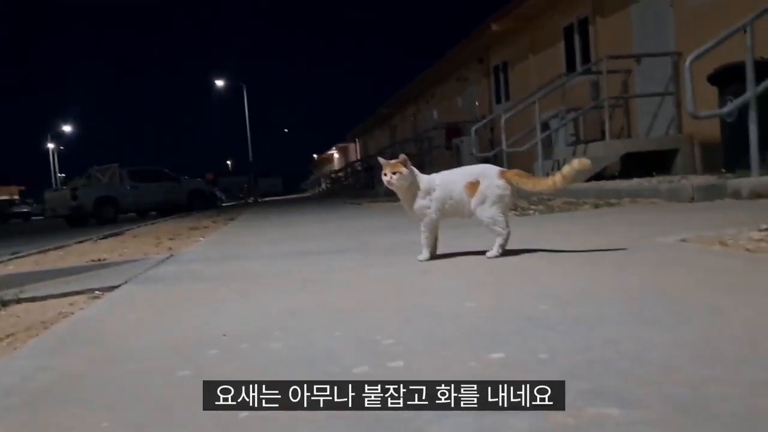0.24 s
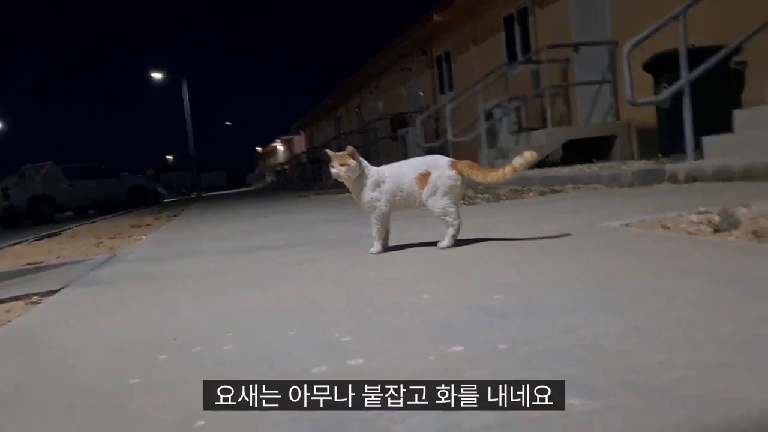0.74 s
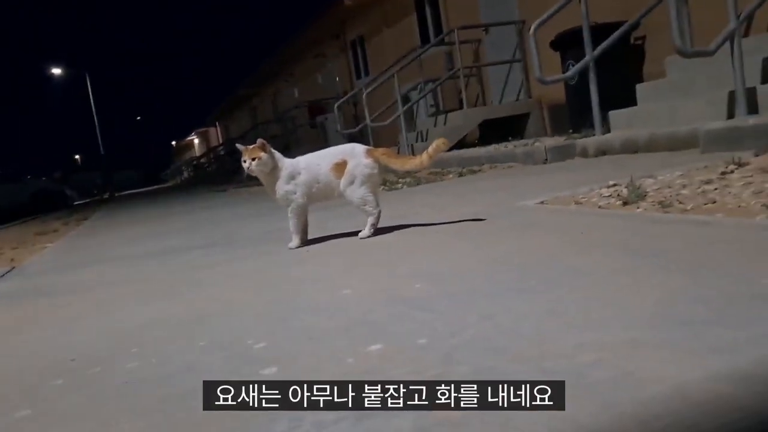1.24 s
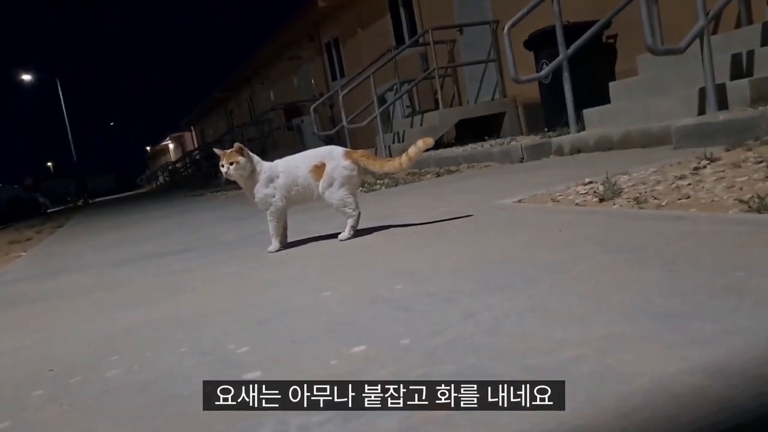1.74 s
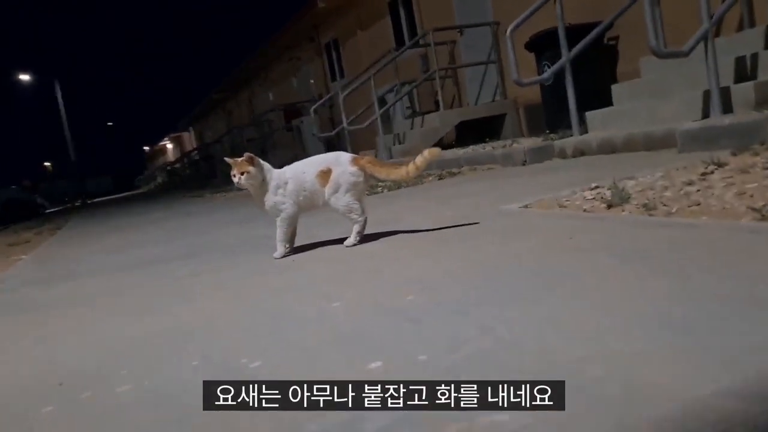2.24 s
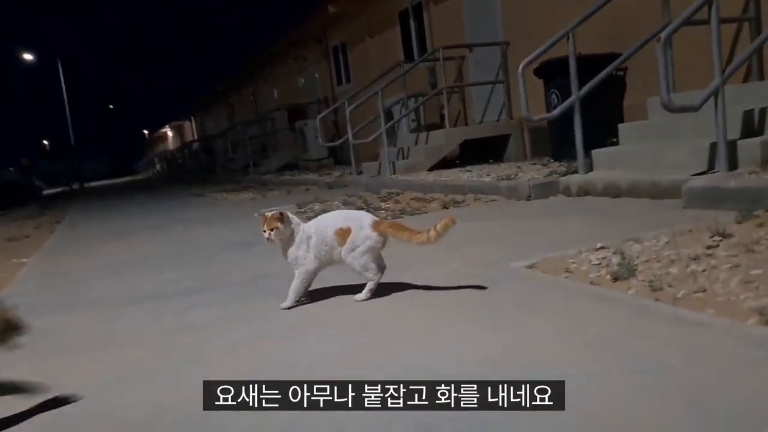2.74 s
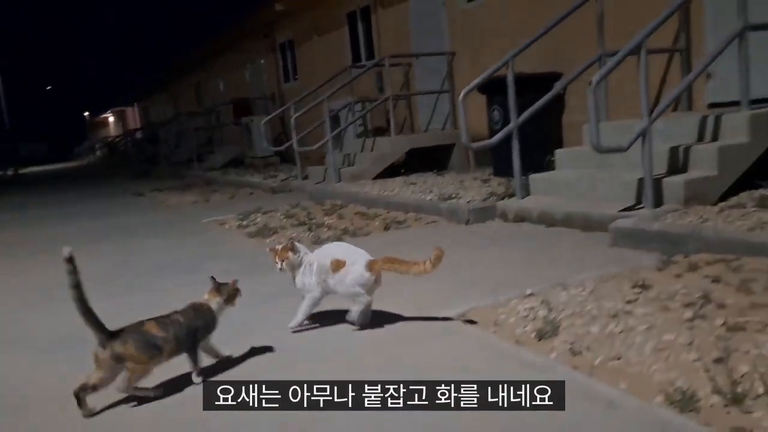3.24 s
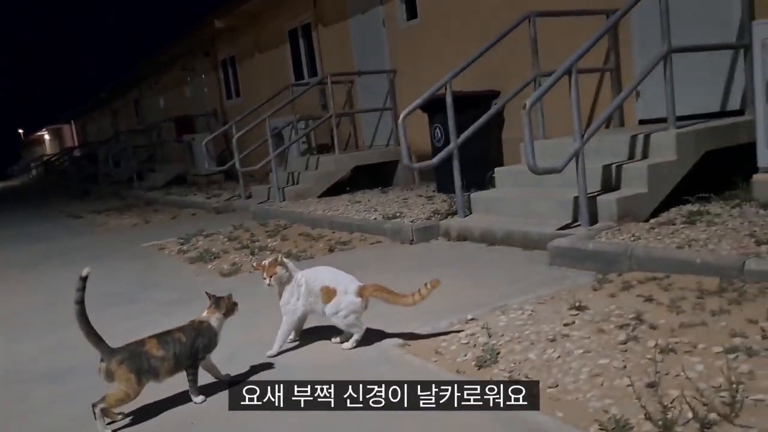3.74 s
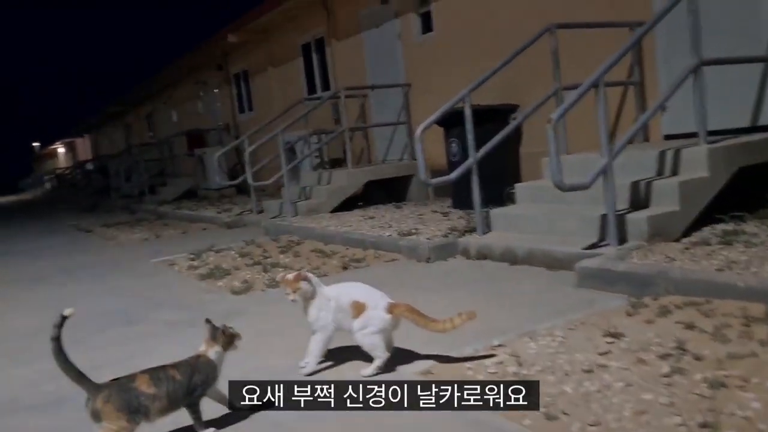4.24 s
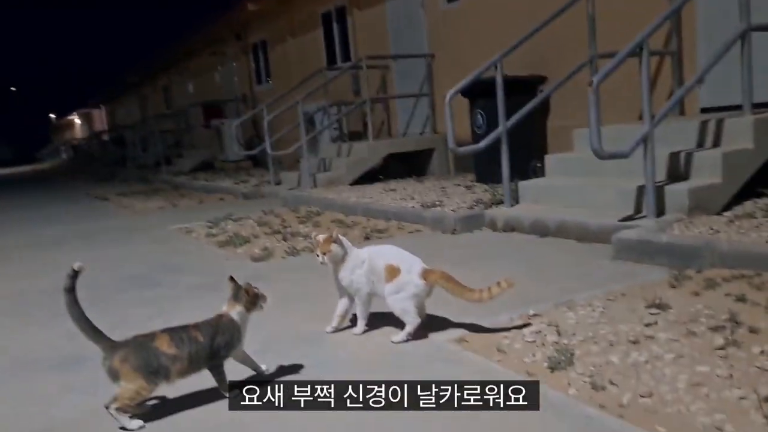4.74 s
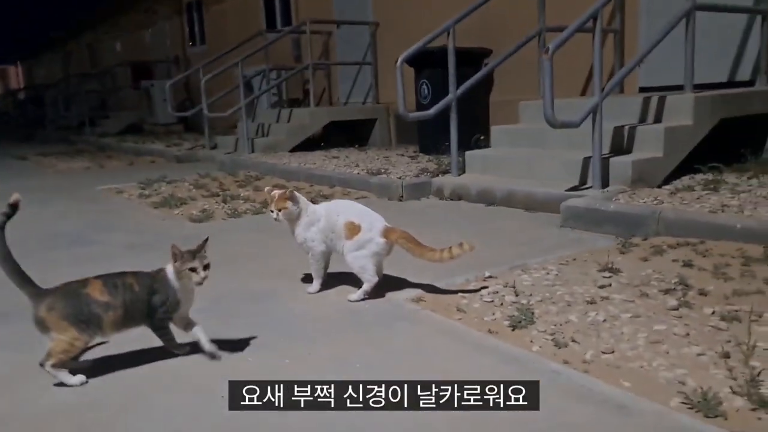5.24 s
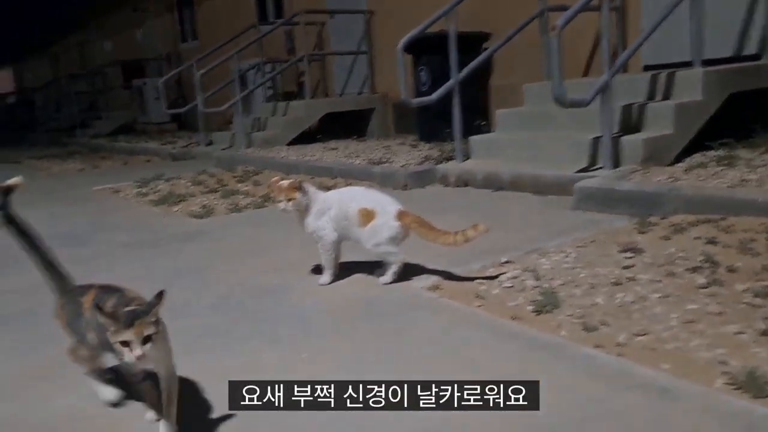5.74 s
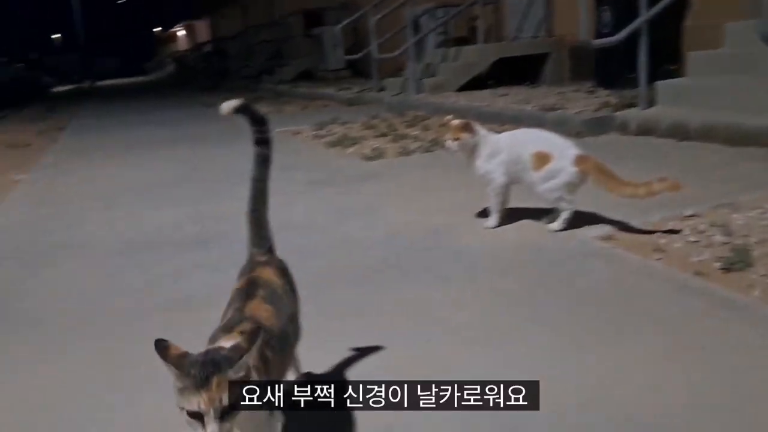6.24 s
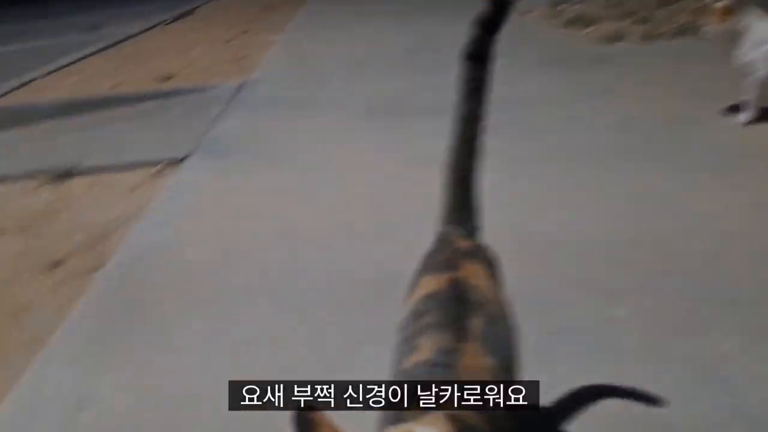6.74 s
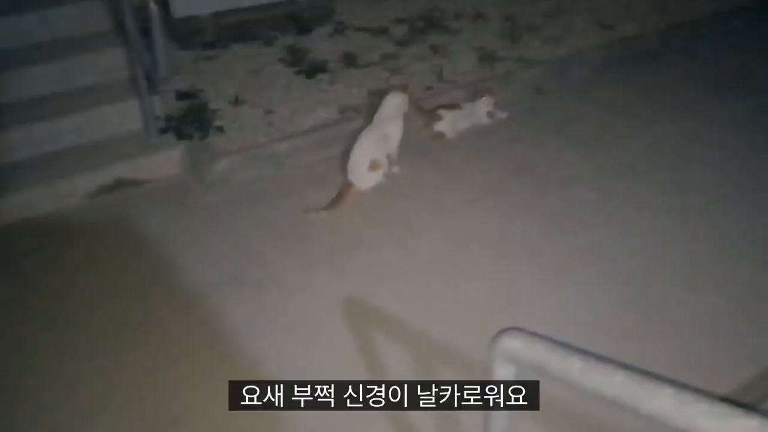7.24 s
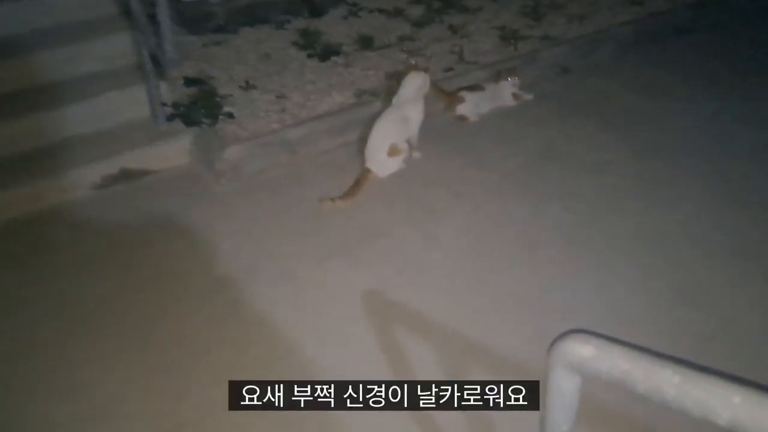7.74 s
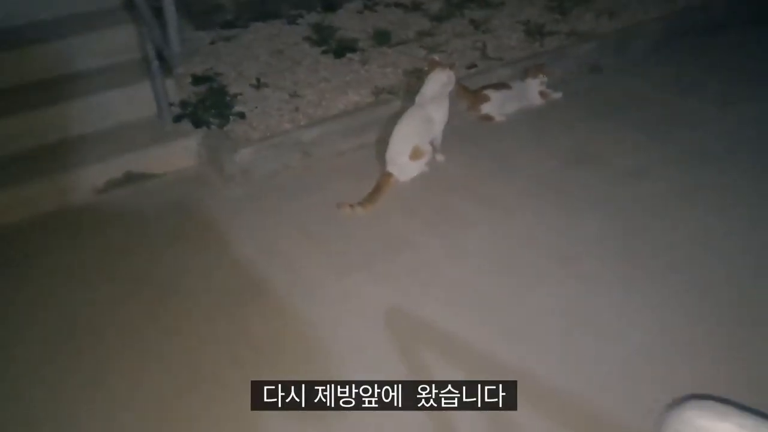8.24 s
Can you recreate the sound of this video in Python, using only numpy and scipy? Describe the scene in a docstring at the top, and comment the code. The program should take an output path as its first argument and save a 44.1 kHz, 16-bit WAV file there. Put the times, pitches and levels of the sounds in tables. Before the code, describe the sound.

Handheld stereo microphone outdoors, cats a few steps off with short echoes from wall and ground. A soft high whine comes under jacket rustle, then a raspy growl with hisses and thin whistles, then a loud strained yowl of over a second. A bird chirps now and then from farther off with a reverberant tail. Wind puffs, small scuffs and tiny metal tinkles surround it; near the end a brief gap leads to a different, low background noise.

```python
"""A concrete path beside a building at night, where two cats face off: one whines, growls and then yowls.
Its voice is a stack of overtones, roughened by strain, plus noise shaped like air in the mouth and teeth.
Gliding tones make a bird's chirps, ringing tones a collar tag, and tiny clicks and noise bursts a jacket and shoes.
A wavering tone and filtered noise make distant machinery, a soft airy hiss and wind.
Near the end the sound drops out briefly and resumes in a second spot with its own steady background noise."""
import sys
import numpy as np
from scipy import signal
from scipy.io import wavfile

SR = 44100
rng = np.random.default_rng(int(sys.argv[2]) if len(sys.argv) > 2 else 0)


def materialize(psi):
    """Save the field psi as 16-bit PCM at rate SR to the path in sys.argv[1].

    A 1-D psi becomes a single channel; in a 2-D psi each row is a channel.
    """
    bounded = np.clip(np.atleast_2d(psi).T, -1, 1)
    quanta = np.round(bounded * 32767).astype(np.int16)
    wavfile.write(sys.argv[1], SR, quanta)


N = 373736
T = np.arange(N) / SR  # time of every sample, in seconds

# Source levels below are starting points; trims, echoes and the final output gain come on top.

# Melody of the yowl. Each row: time in seconds, pitch in Hz.
YOWL_PITCH = [(4.3, 796), (4.36, 898), (4.535, 909), (4.548, 824), (4.585, 826), (4.68, 750), (4.78, 757),
              (4.85, 691), (5.0, 670.7), (5.45, 706.6), (5.54, 752), (5.645, 830), (5.7, 748)]
# The mouth shifts weight between overtones. Each row: time in seconds, second, third and fourth harmonic in dB.
YOWL_OVERTONES = [(4.3, -78, -73.5, -92), (4.38, -67.5, -52.5, -69), (4.6, -64, -53.5, -63.5),
                  (4.665, -57, -68, -75), (4.775, -52, -68, -70), (4.815, -62, -70, -75.5),
                  (4.93, -66.5, -58.5, -75.5), (5.02, -75, -62, -73.5), (5.5, -73.5, -68, -79),
                  (5.61, -58.5, -71, -79), (5.655, -64, -68, -81), (5.7, -79, -78, -86)]
# Strain of the voice. Each row: time in seconds, roughness (about 0 to 1), fundamental in dB,
# loss in dB for each harmonic above the fourth.
YOWL_STRAIN = [(4.3, 1.1, -90, 9), (4.355, 0.97, -77, 8), (4.38, 0.26, -75, 3), (4.61, .3, -78, 3),
               (4.68, 0.15, -80, -1.5), (4.9, 0.16, -82, -1), (5.3, 0.24, -82, 1), (5.45, 0.42, -68.5, -6),
               (5.62, 0.44, -66.5, 4), (5.7, 1.05, -78, 5)]
# Cracks of the voice, a drop and a climb back. Each row: start in seconds, drop in Hz, recovery in seconds.
CRACKS = [(4.376, 65, 0.017), (4.407, 140.5, 0.022), (4.442, 50, 0.013), (4.467, 133, .055)]
# Uneven beating of the vocal folds. Each row: centre in seconds, half-length in seconds, depth in dB.
DOUBLING = [(4.375, 0.032, -9), (4.537, .012, -8), (4.61, .02, -16)]
# Clean lower note that opens the yowl. Each row: time in seconds, pitch in Hz, second and third harmonic in dB.
OPENING = [(4.13, 648, -72, -76), (4.17, 664, -80, -97), (4.22, 667.5, -62, -61),
           (4.35, 642.5, -65.5, -65.5), (4.39, 625, -73, -80), (4.45, 625, -66.5, -70),
           (4.48, 604, -90, -92)]
CRACK_FALL_S = 0.013
YOWL_BREATH_DB, YOWL_CATCH_DB = -22, 1.5  # air noise beside the overtones; unevenness of the effort

# Soft warning whine. Each row: time in seconds, pitch in Hz, fundamental and second harmonic in dB.
WHINE = [(1.3, 818, -67, -75), (1.38, 908, -80, -74), (1.48, 910, -89, -76), (1.56, 881, -86, -68),
         (1.68, 877, -80, -87), (1.82, 836, -69.5, -97), (1.93, 770, -77, -88), (2.0, 720, -66, -80)]
# Growl as the other cat comes near. Each row: time in seconds, pitch in Hz, level between pushes in dB.
GROWL = [(3.0, 450, -78), (3.12, 510, -66), (3.19, 504, -61), (3.27, 426, -66), (3.32, 426, -61),
         (3.39, 455, -76.5), (3.6, 359.9, -67), (3.84, 303, -70)]
# Pushes of air. Each row: centre in seconds, half-length in seconds, voice, hiss and open-mouth rasp in dB.
PUSHES = [(3.125, 0.025, -62, -74.5, -77), (3.242, 0.014, -61.5, -56, -69), (3.382, 0.02, -56.5, -61, -63),
          (3.513, 0.02, -66, -59, -72), (3.574, 0.02, -69, -69, -73), (3.701, 0.031, -69, -69, -67)]
# Thin whistles of the strained voice. Each row: start and end in seconds, first and last pitch in Hz, level in dB.
WHISTLES = [(3.032, 3.25, 1893, 2020, -81), (3.287, 3.476, 1830, 1845, -77),
            (3.467, 3.727, 2170, 2134, -74.5), (3.497, 3.858, 1752, 1520, -80),
            (6.007, 6.073, 1204, 990, -69)]
# Longer hisses through the teeth. Each row: centre in seconds, half-length in seconds, level in dB.
HISSES = [(3.4, 0.35, -80), (5.25, 0.079, -77.5), (5.68, 0.14, -68)]
# Resonances of the throat, open mouth and teeth. Each row: frequency in Hz, width in Hz, level in dB.
THROAT = [(398, 163, -1.5), (835, 320, -11), (1700, 310, -20.5), (2190, 440, -16.5), (3400, 730, -21),
          (7140, 470, -5)]
OPEN_MOUTH = [(740, 206, 1), (1030, 190, -4)]
TEETH = [(3700, 1800, -8.5), (5700, 660, -2), (7380, 400, 1.5), (8550, 990, -7)]
GROWL_ROUGH, PUSH_ROUGH = 0.344, 0.62  # roughness at rest, and added by a push

# Echoes of wall and ground. Each row: typical delay in seconds, level in dB.
ECHOES = [(.007, -3), (.019, -6.5), (.026, -12), (.033, -21), (.047, -18), (0.061, -26.5)]

# One chirp, an arch and then a kink. Each row: time after its start in seconds, pitch in Hz, level in dB.
CHIRP = [(0, 3850, -20.5), (.007, 4650, -14.5), (.019, 5050, -17), (.027, 4350, -8), (.033, 3950, -3),
         (.039, 3720, -8.5), (.045, 3150, -26), (.052, 2980, -34), (.058, 3300, -14), (.064, 3730, -3),
         (.069, 4300, -10), (.076, 3550, -11.5), (.085, 2850, -13.5)]
# The bird's second, higher voice. Each row: time after the start in seconds, pitch in Hz, level in dB.
SECOND_VOICE = [(.004, 5100, -29), (.013, 5500, -23.5), (.035, 5550, -24.5), (.046, 4700, -18),
                (.056, 3900, -23), (.062, 3600, -30)]
# When the bird calls. Each row: start in seconds, direct and scattered level in dB, pitch factor.
CHIRPS = [(.13, -83, -76, 0.76), (0.325, -77, -76, 1), (.705, -57.5, -54, 1.003), (1.028, -70.5, -71, 0.96),
          (1.06, -68, -75, 0.95), (1.157, -65.5, -66, 1.04), (2.092, -52.5, -50, 1.01),
          (2.542, -73, -62.5, 0.87), (3.769, -49.5, -51.5, 0.99), (4.431, -57.5, -59.5, 1.03),
          (5.203, -47, -49, .99), (6.71, -79, -69, .86), (6.94, -75, -65.5, 1.02), (7.056, -72, -66.5, 1),
          (7.128, -74, -62, .93), (7.398, -47.5, -50, 1.01)]
BIRD_ECHO_S, BIRD_ECHO_DB, BIRD_SCATTER_T60_S = 0.016, -15.5, 0.12
BIRD_TAIL_DB, BIRD_TAIL_T60_S, BIRD_TAIL_HZ = -9, 0.8, (3120, 4320)

# Touches of the collar tag. Each row: time in seconds, low and high mode in dB.
TAG_TOUCHES = [(5.75, -76, -70), (5.942, -50, -77), (6.04, -60, -75), (6.165, -83, -71),
               (6.382, -48.5, -68), (6.46, -86, -76), (6.757, -64, -76), (7.22, -77, -72),
               (7.263, -61, -65), (7.31, -72, -67), (7.355, -74, -73)]
# Ringing tones of the tag. Each row: frequency in Hz, time to fall 60 dB in seconds.
TAG_MODES = [(9550, 0.095), (11990, 0.21)]

# Fingers click on the case. Each row: time in seconds, level in dB.
CASE_CLICKS = [(0.0772, -26), (0.0803, -33), (0.0843, -13.5), (.106, -7.5)]
# Ringing tones of the case. Each row: frequency in Hz, level in dB, time to fall 60 dB in seconds.
CASE_MODES = [(520, -5, 0.0048), (794, -13.5, 0.002), (1340, -11.5, 0.0029), (2800, -24, 0.0016),
              (8330, -14, 0.0017)]
# Fingers rub the case. Each row: centre in seconds, half-length in seconds, level in dB.
FINGER_RUB = [(.08, 0.0092, -57), (.113, 0.007, -62)]

# The jacket slides as the arm moves. Each row: start and length in seconds, first and last level in dB.
STROKES = [(0.344, 0.23, -89.5, -74), (0.554, 0.24, -84, -84), (1.225, .33, -53.5, -58),
           (1.573, 0.47, -62.5, -60), (2.055, 0.29, -64.5, -72.5), (2.334, 0.039, -47, -55.5),
           (2.582, 0.34, -69.5, -71), (2.938, 0.9, -70, -76.5), (4.23, 1.4, -80.5, -79),
           (5.528, 0.297, -79, -61), (5.819, 0.48, -64.5, -74.5), (6.35, 0.28, -86, -86),
           (6.943, 0.59, -88, -78.5), (7.542, 0.18, -74, -79)]
# Tone colour of the rustle. Each row: frequency in Hz, relative level per Hz in dB.
RUSTLE_COLOUR = [(300, -7.5), (800, -5.5), (1400, -3), (2400, 0), (4400, -2), (7000, -6.5), (10500, -13.5),
                 (13500, -10.5), (17000, -2)]
# Snaps of fabric and grit. Each row: time in seconds, starting level in dB, left over right in dB.
SNAPS = [(.397, -67, -3), (1.308, -38, -1), (1.378, -53, -2), (1.4045, -41, -1), (1.479, -43, 0),
         (1.516, -43.5, 3), (1.556, -36.5, 0), (1.562, -39, 0), (1.6166, -41, -1), (1.634, -43.5, 2),
         (1.653, -38, -2), (1.7237, -43, -3), (1.7563, -49, 0), (1.7946, -40, 5), (1.814, -47, 0),
         (1.825, -43, -2), (1.869, -42, 4), (1.9231, -44, 0), (1.9405, -43, -1.5), (1.9642, -36.5, 1),
         (2.0144, -41, -1), (2.021, -47, -3), (2.1563, -46.5, 2), (2.2213, -50.5, -4), (2.37, -44.5, -2),
         (2.4784, -54.5, -8), (2.842, -46.5, -2), (2.8747, -45, -6), (3.484, -51, 3), (4.6696, -50.5, -3),
         (4.72, -55.5, -2), (4.78, -61, 0), (4.885, -61, 7), (5.647, -67, -1.5), (5.941, -42.5, -4),
         (6.948, -65, 5), (6.9955, -52, 2), (7.0948, -58, 4), (7.114, -60.5, 5), (7.236, -56, 1),
         (7.556, -57.5, -9)]
# Shoe and paw scuffs. Each row: time in seconds, starting level in dB, guide frequency in Hz,
# time to fall 60 dB in seconds.
SCUFFS = [(0.578, -60.5, 1746, 0.1), (1.273, -30.5, 1395, 0.016), (1.275, -45.5, 364, 0.11),
          (1.285, -41, 895, 0.016), (1.943, -42, 940, 0.019), (2.028, -58, 1122, .09),
          (2.372, -51, 2690, 0.041), (2.876, -52, 2430, 0.053), (3.233, -45.5, 4230, 0.024),
          (3.485, -60, 3530, 0.056), (5.346, -51.5, 1814, 0.022), (5.976, -44.5, 1260, 0.078),
          (6.088, -51.5, 3000, 0.023), (6.102, -51, 3165, 0.042), (8.014, -63, 1600, 0.039)]
# One long scrape of a shoe. Each row: time in seconds, level in dB.
SCRAPE = [(7.98, -92), (8.03, -78.5), (8.13, -82.5), (8.17, -66.5), (8.2, -73.5), (8.3, -86), (8.47, -99)]
# Noise bands of the scrape. Each row: centre in Hz, width in Hz, relative level in dB.
SCRAPE_GRIT = [(2340, 1900, 7), (4400, 4800, -6.5)]
STROKE_ATTACK_S, STROKE_T60_S, RUSTLE_FLICKER_DB = 0.08, 0.19, 1.5
CRACKLE_PER_S, CRACKLE_DB = 170, -9  # lone crackles among the rustle

# Distant machinery. Each row: time in seconds, drone and rumble level in dB.
MACHINERY = [(0, -61.5, -56), (1.2, -57.5, -55.5), (2.2, -61, -57), (3.6, -57.5, -58), (5.0, -56.5, -60),
             (5.3, -60.5, -58.5), (6.65, -57, -57.5), (6.8, -67, -60), (7.45, -69, -59)]
# Soft airy hiss, stronger while the jacket moves. Each row: time in seconds, level in dB.
AIRY_HISS = [(0, -69.5), (.9, -76.5), (1.33, -73.5), (1.46, -66), (1.91, -66), (2.41, -72.5), (3.07, -71.5),
             (3.32, -66), (3.85, -69.5), (4.5, -68.5), (5.6, -66), (6.96, -74), (7.5, -73.5)]
# Puffs of wind on the microphone ports. Each row: centre in seconds, half-length in seconds, level in dB.
GUSTS = [(2.85, 0.12, -69), (4.64, 0.039, -50), (4.7, 0.3, -59), (6.55, 0.11, -60), (7.45, .035, -60.5)]
# Tone colours of rumble, airy hiss and second spot. Each row: frequency in Hz, relative level per Hz in dB.
RUMBLE_COLOUR = [(15, -28), (25, -17), (59, -10), (75, 1.5), (92, 2.5), (151, -7.5), (194, -7), (330, -21),
                 (425, -31), (569, -43), (600, -28), (780, -54), (1320, -120)]
AIRY_COLOUR = [(300, 8), (480, -4.5), (750, -4), (1250, -7.5), (2100, -23), (3500, -24), (5500, -26),
               (9000, -31), (16000, -35)]
NEW_SPOT_COLOUR = [(20, -20), (45, -2.5), (85, 1.5), (135, -6.5), (230, -6.5), (350, -15.5), (500, -22),
                   (900, -22.5), (1500, -34), (2800, -46), (5500, -56.5), (16000, -57.5)]
# How alike left and right are. Each row: frequency in Hz, likeness (1 is identical, 0 unrelated).
LIKENESS = [(40, 0.082), (90, 0.92), (180, 1), (400, 0.31), (1000, 0.024), (3000, 0.027), (10000, 0.068)]
DRONE_HZ, DRONE_WAVER, DRONE_WAVER_PER_S = 90.2, 0.33, 6.9
BREEZE_DB = -76
NEW_SPOT_S, NEW_SPOT_DB = 7.535, -60.5

# Output gain, with the brief dropout. Each row: time in seconds, gain in dB.
OUTPUT_GAIN = [(7.5, 11.5), (7.522, -20), (7.55, -23), (7.558, 15.5)]
CUTOFF_HZ = 16200


def yowl(count=8, upper_cut_db=14):
    """A clean note breaks upward into a cracking scream, sinks to a wail and rises again."""
    hz, second, third = in_time(OPENING)
    opening = larynx(hz, 0.13, [second - 16, second, third],
                     jitter=0.036, rasp=0.64, flutter=0.0018, shimmer_db=0.9)
    hz, = in_time(YOWL_PITCH)
    for s, drop, recovery in CRACKS:
        hz = hz - np.interp(T - s, [0, CRACK_FALL_S, CRACK_FALL_S + recovery], [0, drop, 0])
    second, third, fourth = in_time(YOWL_OVERTONES)
    rough, first, roll_off = in_time(YOWL_STRAIN)
    # overtones above the mouth's upper resonance are cut further
    upper = [fourth - roll_off * (k - 4) - upper_cut_db * np.interp(k * hz, [3500, 4200], [0, 1])
             for k in range(4, count + 1)]
    wail = larynx(hz, rough, [first, second, third] + upper,
                  jitter=0.04005, rasp=0.45, flutter=0.00338, shimmer_db=1.4)
    # swelling and fading at half the pitch adds tones between the overtones
    half_pitch = np.sin(np.pi * np.cumsum(hz) / SR)
    wail = wail * (1 + swells(DOUBLING) * half_pitch)
    # turbulence at the folds spreads a skirt of noise around each overtone
    effort = from_db(YOWL_CATCH_DB * drift(11.7) - 2)
    breath = 1 + from_db(YOWL_BREATH_DB) * drift(490)
    return opening * during(OPENING) + wail * effort * breath * during(YOWL_OVERTONES)


def growl():
    """A rough low moan that comes in pushes, each rasping through the open mouth, with thin whistles on top."""
    hz, level_db = in_time(GROWL)
    gain = from_db(level_db) + swells([row[:3] for row in PUSHES])
    pushing = sum(swell(*row[:2]) for row in PUSHES)
    rough = np.clip(GROWL_ROUGH + PUSH_ROUGH * pushing, 0, 1)
    voice = gain * during(GROWL) * moan(hz, rough, air_db=-8.5, count=8)
    rasp_gain = swells([(s, half_s, db) for s, half_s, _, _, db in PUSHES])
    rasp = rasp_gain * air_through(OPEN_MOUTH)
    return voice + rasp + sum(whistle(*row) for row in WHISTLES)


def whine():
    """A thin note of two harmonics whose balance shifts as the mouth moves."""
    hz, first, second = in_time(WHINE)
    return during(WHINE) * larynx(hz, 0.15, [first, second], jitter=0.038, rasp=0.88, flutter=0.0053)


def hiss():
    """Air forced past the teeth during the growl and as the yowl gives out."""
    push_gain = swells([(s, half_s, db) for s, half_s, _, db, _ in PUSHES])
    return (swells(HISSES) + push_gain) * air_through(TEETH)


def moan(hz, rough, air_db, count):
    """Half-closed mouth: harmonics and air noise are shaped by the same throat resonances."""
    grid = np.geomspace(100, SR / 2, 400)
    power = sum(from_db(db) ** 2 / (1 + (2 * (grid - f) / width) ** 2) ** 2 for f, width, db in THROAT)
    throat_db = 10 * np.log10(power)
    harmonics_db = [np.interp(k * hz, grid, throat_db) for k in range(1, count + 1)]
    voiced = larynx(hz, rough, harmonics_db, jitter=0.0752, rasp=0.85, flutter=0.00797)
    return voiced + from_db(air_db) * rough * air_through(THROAT)


def whistle(start, end, first_hz, last_hz, level_db):
    """One thin, unsteady glide of the strained voice."""
    path = [(start, first_hz), (end, last_hz)]
    hz, = in_time(path)
    return during(path) * larynx(hz, 0.7, [level_db], jitter=0.025, rasp=0.62, flutter=0.012, shimmer_db=2.5)


def larynx(hz, rough, harmonics_db, jitter, rasp, flutter, shimmer_db=1.0):
    """Vocal folds make harmonics; strain makes cycles uneven in length and strength, and overtones shimmer."""
    pitch = hz * (1 + flutter * drift(26.2) + jitter * rough * drift(149.0))
    phase = 2 * np.pi * np.cumsum(pitch) / SR
    tone = 0
    for k, db in enumerate(harmonics_db, 1):
        shimmer = shimmer_db * np.sqrt(k / 2) * drift(22.5)
        tone = tone + from_db(db + shimmer) * np.sin(k * phase)
    uneven = (1 + rasp * rough * drift(295)) / np.sqrt(1 + (rasp * rough) ** 2)
    return np.sqrt(2) * tone * uneven


def air_through(resonances, gusty_db=5.5, shifting_db=3.5):
    """Turbulent air, as noise in bands at the resonances of the mouth; rms 1."""
    air = rng.standard_normal(N) * from_db(gusty_db * drift(60))
    return rms_one(sum(from_db(db + shifting_db * drift(21.5)) * band(air, f - width / 2, f + width / 2)
                       for f, width, db in resonances))


def outdoors(x, lag_s, echo_db, tail_db, t60):
    """Direct sound reaches the left port first; walls add echoes, steps and railings a scattered tail."""
    direct = np.array([x, delayed(x, lag_s)])
    echoes = np.array([sum(from_db(db) * delayed(side, s * rng.uniform(.9, 1.1)) for s, db in ECHOES)
                       for side in direct])
    return direct + from_db(echo_db) * echoes + from_db(tail_db) * scatter(x, t60)


def scatter(x, t60):
    """A dying stereo tail of countless small reflections, made with fading noise."""
    t = T[:SR // 2]
    response = rng.standard_normal((2, len(t))) * from_db(-60 * t / t60) * np.minimum(t / .02, 1)
    return signal.fftconvolve(x[None], response / np.linalg.norm(response[0]), axes=1)[:, :N]


def bird():
    """Two-voiced chirps arrive directly, off one wall, and scattered by the buildings."""
    direct, indirect = np.zeros((2, N))
    for start, direct_db, scattered_db, factor in CHIRPS:
        chirp = glide(CHIRP, factor) + glide(SECOND_VOICE, factor)
        i = int(start * SR)
        direct[i:i + len(chirp)] += from_db(direct_db) * chirp
        indirect[i:i + len(chirp)] += from_db(scattered_db) * chirp
    wall = from_db(BIRD_ECHO_DB) * delayed(direct, BIRD_ECHO_S) * pan(4)
    tail = from_db(BIRD_TAIL_DB) * scatter(band(indirect, *BIRD_TAIL_HZ), BIRD_TAIL_T60_S)
    return direct + wall + scatter(indirect, BIRD_SCATTER_T60_S) + tail


def glide(rows, factor, vary=.012):
    """One thin whistled line of a chirp, a little different each time."""
    t, (s, hz, db) = T[:SR // 8], np.transpose(rows)
    pitch = np.interp(t, s, factor * hz * rng.normal(1, vary, len(hz)))
    phase = 2 * np.pi * np.cumsum(pitch) / SR
    level_db = np.interp(t, s, db + rng.normal(0, 0.37, len(db)))
    edges = np.clip(np.minimum(t - s[0], s[-1] - t) / .002, 0, 1)
    return edges * from_db(level_db) * np.sin(phase)


def tag():
    """A small metal tag rings in two high modes at each touch."""
    s, *levels = np.transpose(TAG_TOUCHES)
    return sum(ring(clicks(s, db), hz, t60) for db, (hz, t60) in zip(levels, TAG_MODES))


def handling():
    """Fingers rub and click on the case, almost only at the left port."""
    rub = swells(FINGER_RUB) * rms_one(band(rng.standard_normal(N), 730, 4600, order=1))
    return (case_clicks() + rub) * from_db([[0], [-31]])


def case_clicks(spread_s=0.00004):
    """Dry clicks through the case; stiff plates pass high modes first, so low ones start a little later."""
    hits, top_hz = clicks(*np.transpose(CASE_CLICKS)), CASE_MODES[-1][0]
    out = 0
    for k, (hz, db, t60) in enumerate(CASE_MODES, 1):
        # the pressure follows the speed of the wall, so each mode starts at its peak
        mode = from_db(db) * np.gradient(ring(hits, hz, t60)) * SR / (2 * np.pi * hz)
        lag_s = spread_s * (np.sqrt(top_hz / hz) - 1)
        out = out + (-1) ** k * delayed(mode, lag_s)  # neighbouring modes start in opposite directions
    return out


def movement():
    """Jacket rustle, its sharper snaps, scuffs and a scrape on the concrete."""
    sliding = sum(stroke(*row) for row in STROKES) * from_db(RUSTLE_FLICKER_DB * drift(29.0))
    fabric = coloured(crinkle, RUSTLE_COLOUR, [(500, 0.088), (4000, 0.0037)], patchy_db=2.75)
    rustle = sliding * (fabric + from_db(CRACKLE_DB) * crackle())
    snaps = sum(burst(s, db, 2000, 12300, t60=0.0059) * pan(left_db) for s, db, left_db in SNAPS)
    scuffs = sum(burst(s, db, hz / 1.2, hz * 0.94, t60) for s, db, hz, t60 in SCUFFS)
    grit = rms_one(sum(from_db(db) * band(white(), f - width / 2, f + width / 2)
                       for f, width, db in SCRAPE_GRIT))
    scrape_db, = in_time(SCRAPE)
    scrape = from_db(scrape_db + 2 * drift(62)) * during(SCRAPE) * grit
    return rustle * pan(-1.4) + snaps + scuffs + scrape


def stroke(start, length, first_db, last_db):
    """Gain of one slide: a quick attack, a sloping hold, a dying release."""
    t = T - start
    release_db = 60 * np.clip((t - length) / STROKE_T60_S, 0, 2)
    level_db = np.interp(t, [0, length], [first_db, last_db]) - release_db
    return np.clip(t / STROKE_ATTACK_S, 0, 1) * from_db(level_db)


def crinkle(per_s=2200, spread_db=3.0):
    """Fabric slips in dense clumps of tiny clicks of uneven size."""
    born = rng.random((2, N)) < per_s * from_db(2.5 * drift(70)) / SR
    sizes = from_db(spread_db * np.minimum(rng.exponential(1, (2, N)), 4.5))
    return born * rng.choice([-1, 1], (2, N)) * sizes


def crackle():
    """Lone sharp crackles of stiff fabric, each a fading speck of noise; rms 1."""
    born = rng.random(N) < CRACKLE_PER_S / SR
    sizes = born * from_db(4.5 * np.minimum(rng.exponential(1, N), 3)) * rng.standard_normal((2, N))
    grit = rng.standard_normal(SR // 200) * from_db(-60 * T[:SR // 200] / .003)
    return rms_one(band(signal.lfilter(grit, [1], sizes), 2120, 22000, order=1))


def burst(s, level_db, low_hz, high_hz, t60):
    """A short dying crunch, like many tiny contacts, made of filtered noise."""
    out, t, i = np.zeros((2, N)), T[:SR // 5], int(s * SR)
    grit = rms_one(band(rng.standard_normal((2, len(t))), low_hz, high_hz, order=1))
    out[:, i:i + len(t)] = from_db(level_db - 60 * t / t60) * grit
    return out


def surroundings():
    """A wavering machine drone, low rumble, soft airy hiss and puffs of wind."""
    airy_db, = in_time(AIRY_HISS)
    drone_db, rumble_db = in_time(MACHINERY)
    phase = 2 * np.pi * DRONE_HZ * T
    steady = (1 + DRONE_WAVER * drift(DRONE_WAVER_PER_S)) * np.sin(phase)
    wandering = 0.67 * drift(6.0) * np.cos(phase)
    drone = from_db(drone_db) * rms_one(steady + wandering)
    rumble = from_db(rumble_db) * coloured(white, RUMBLE_COLOUR, LIKENESS, patchy_db=1.8)
    airy_hiss = from_db(airy_db) * coloured(white, AIRY_COLOUR, LIKENESS, patchy_db=3.13)
    shared = 0.52 * rng.standard_normal(N)  # the part of the wind common to both ports
    puffs = rms_one(band(white() + shared, 43.7, 88, order=3))
    wind = (from_db(BREEZE_DB) + swells(GUSTS)) * puffs * pan(3.7)
    return (drone + rumble) * pan(0.61) + airy_hiss + wind


def second_spot():
    """Background of the second spot: noise strongest in the bass, at a steady overall level."""
    noise = coloured(white, NEW_SPOT_COLOUR, LIKENESS, patchy_db=2.3)
    return from_db(NEW_SPOT_DB) * noise * pan(-0.6)


def coloured(draw, spectrum, likeness, patchy_db):
    """Stereo bands about half an octave wide, each with its own level and flicker; rms 1."""
    out, raw = 0, [draw(), draw()]
    low_end, high_end = spectrum[0][0], spectrum[-1][0]
    edges = np.geomspace(low_end, high_end, 1 + round(2 * np.log2(high_end / low_end)))
    for k, (low, high) in enumerate(zip(edges, edges[1:])):
        mid, side = band(raw[k % 2], low, high)
        hz = np.sqrt(low * high)
        alike = np.clip(at_hz(likeness, hz), -1, 1)
        stereo = np.sqrt(1 + alike) * mid + np.sqrt(1 - alike) * side * [[1], [-1]]
        out = out + from_db(at_hz(spectrum, hz) + patchy_db * drift(9.9)) * stereo
    return rms_one(out)


def white():
    """Two unrelated noises."""
    return rng.standard_normal((2, N))


def drift(rate):
    """Smooth random wandering of rms 1; a higher rate (Hz) wanders faster."""
    r = np.exp(-20 * np.pi * rate / SR)  # worked out at every tenth sample
    slow = signal.lfilter([1], [1, -2 * r, r * r], rng.standard_normal(N // 10 + 8002))[8000:]
    return np.interp(np.arange(N) / 10, np.arange(len(slow)), rms_one(slow))


def swell(s, half_s):
    """A smooth rise and fall of height one."""
    return np.exp(-.5 * ((T - s) / half_s) ** 2)


def swells(rows):
    """The summed gain of a table of swells."""
    return sum(from_db(db) * swell(s, half_s) for s, half_s, db in rows)


def in_time(rows):
    """Each column of a curve at every sample."""
    s, *columns = np.transpose(rows)
    return [np.interp(T, s, c) for c in columns]


def during(rows):
    """One while a curve lasts, with soft edges."""
    return np.clip(np.minimum(T - rows[0][0], rows[-1][0] - T) / .015, 0, 1)


def at_hz(points, hz):
    """Read a spectrum on a log-frequency axis."""
    return np.interp(np.log(hz), np.log(np.array(points)[:, 0]), np.array(points)[:, 1])


def band(x, low_hz, high_hz, order=2):
    """Keep only the sound between two frequencies (Butterworth band-pass)."""
    sos = signal.butter(order, [low_hz, min(high_hz, .45 * SR)], "band", fs=SR, output="sos")
    return signal.sosfilt(sos, x + 1e-18)


def ring(x, hz, t60):
    """A unit click sets a sine ringing from height 1, falling 60 dB in t60 seconds."""
    r, w = from_db(-60 / (t60 * SR)), 2 * np.pi * hz / SR
    return signal.lfilter([0, np.sin(w)], [1, -2 * r * np.cos(w), r * r], x + 1e-18)


def clicks(times, levels_db):
    """Single impulses."""
    out = np.zeros(N)
    out[np.round(np.asarray(times) * SR).astype(int)] = from_db(levels_db)
    return out


def delayed(x, s):
    """The same sound a little later."""
    return np.interp(T - s, T, x, left=0)


def pan(left_db):
    """Gains that make the left channel this many dB louder than the right."""
    return from_db([[left_db / 2], [-left_db / 2]])


def from_db(db):
    """Decibels to gain."""
    return 10 ** (np.asarray(db) / 20)


def rms_one(x):
    """Scale to unit power."""
    return x / np.sqrt(np.mean(x ** 2) + 1e-20)


def scene():
    """Cats a few steps away, the bird farther off, small noises close by; the background moves to a second spot."""
    voices = whine() + growl() + yowl() + hiss()
    cats = outdoors(voices, lag_s=.00008, echo_db=-9.5, tail_db=-21.5, t60=0.51) * pan(1.6)
    collar = outdoors(tag(), lag_s=.00001, echo_db=-1.5, tail_db=-14.5, t60=0.52) * pan(-3.5)
    background = np.where(T < NEW_SPOT_S, surroundings(), second_spot())
    return cats + bird() * pan(3.6) + collar + handling() + movement() + background


def record(dry):
    """Strong peaks are rounded off, the gain dips for a moment, and the highest treble is cut."""
    gain_db, = in_time(OUTPUT_GAIN)
    rounded = .55 * np.tanh(dry / .55)
    low_pass = signal.ellip(10, .2, 70, CUTOFF_HZ, fs=SR, output="sos")
    return signal.sosfilt(low_pass, rounded * from_db(gain_db))


dry = scene()
out = record(dry)
materialize(out)
```